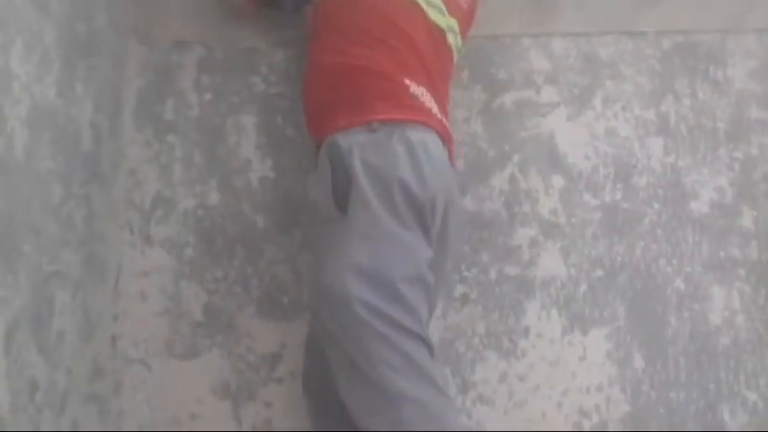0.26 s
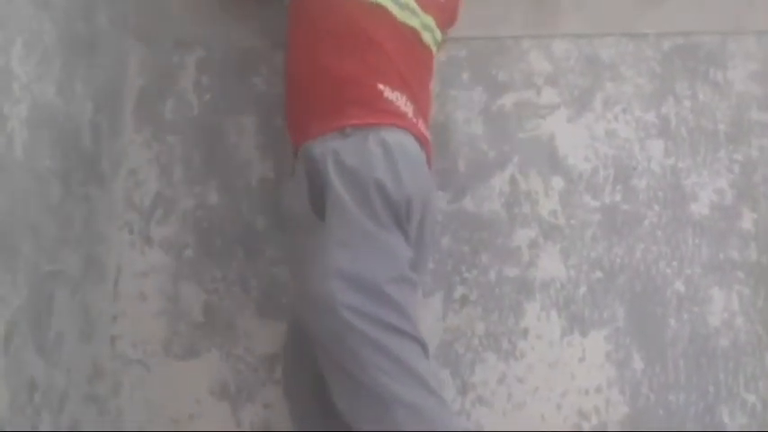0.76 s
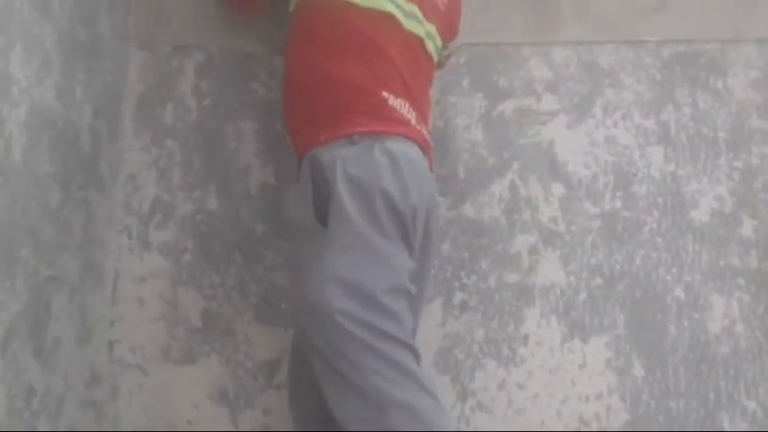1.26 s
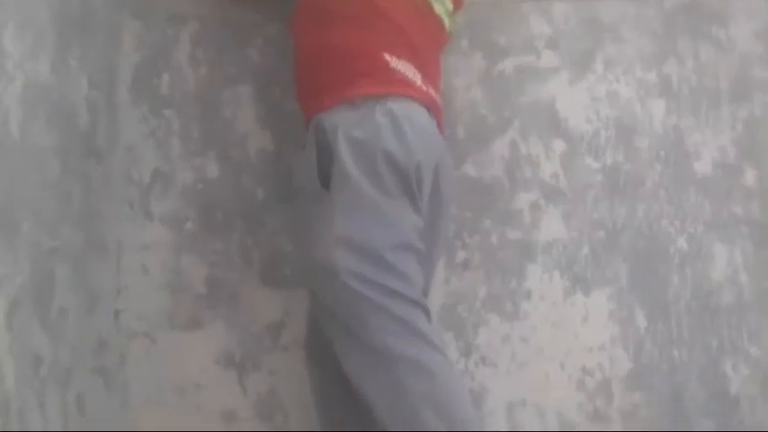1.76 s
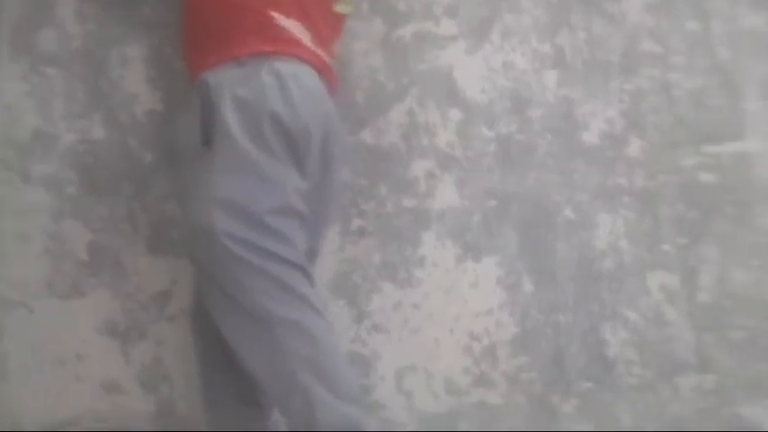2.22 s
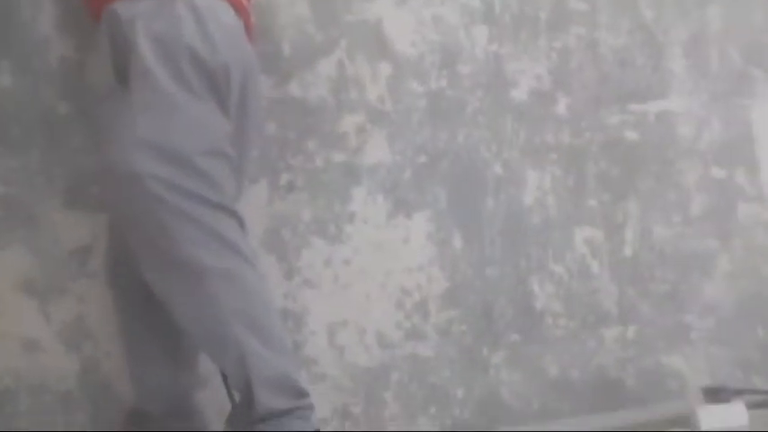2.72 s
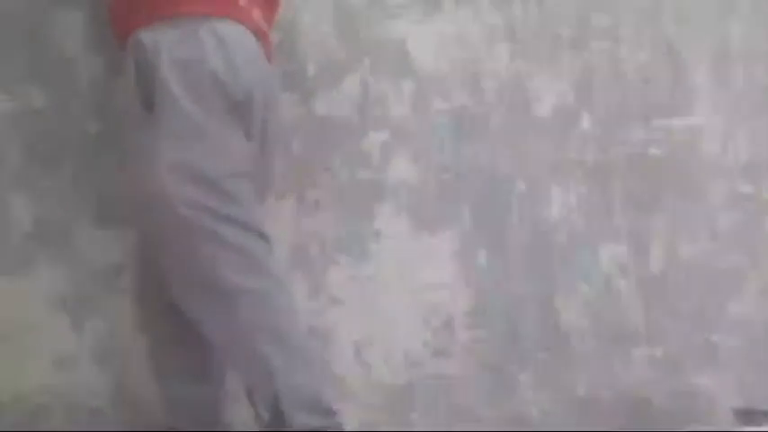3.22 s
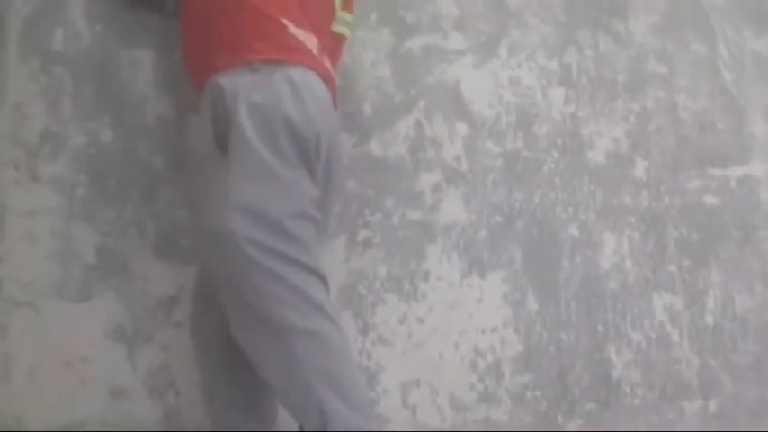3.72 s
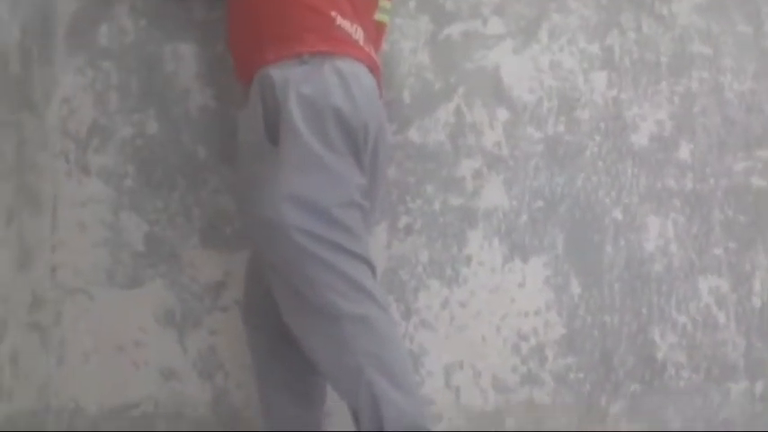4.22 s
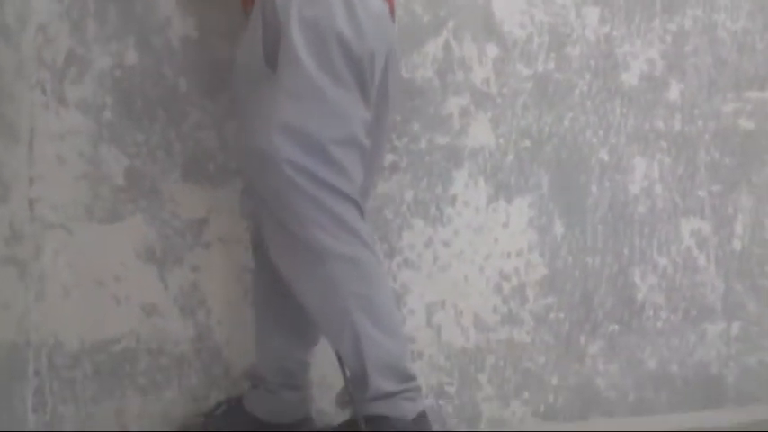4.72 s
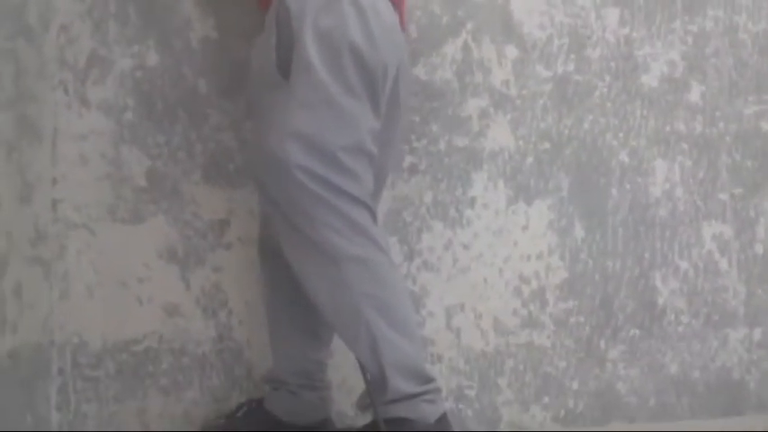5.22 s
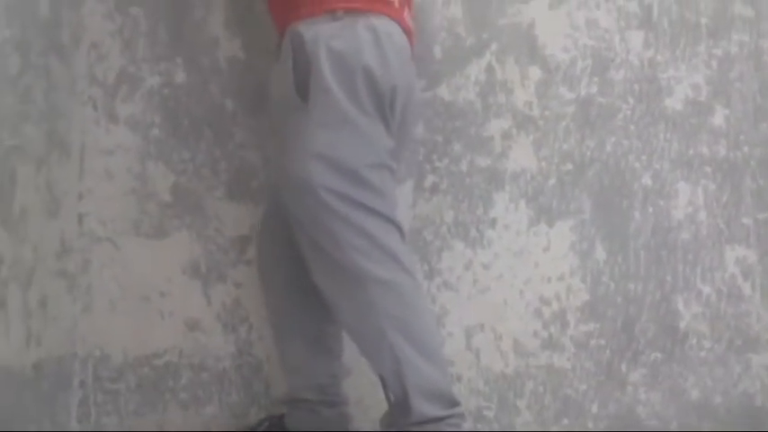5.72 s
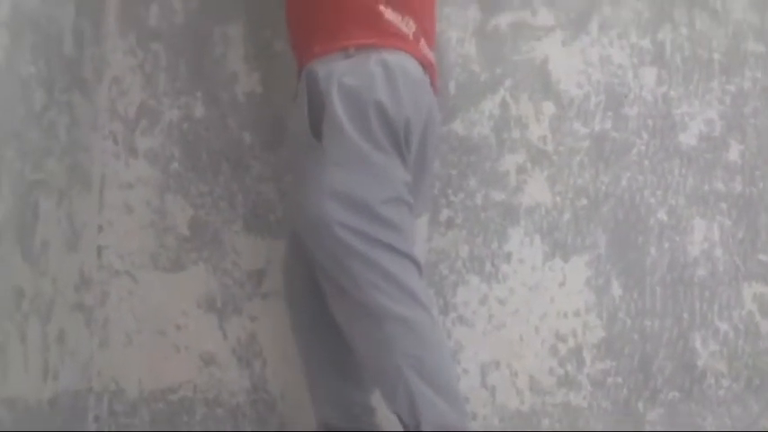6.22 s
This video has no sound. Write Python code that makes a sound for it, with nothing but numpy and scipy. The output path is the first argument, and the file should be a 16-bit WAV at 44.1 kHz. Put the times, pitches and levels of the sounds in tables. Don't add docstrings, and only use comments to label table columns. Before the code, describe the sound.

A close microphone in a bare, hard-walled room at a building site. At first a motor whirs down from earlier work, with a crumb ticking at 0.5 s. At about 0.6 s the rotary hammer restarts, its motor rising quickly into rough, dense hammering of about seventy blows a second, with crunching mortar and metallic chisel rattle. It stops at 1.2 s and the whir sinks in pitch and fades until about 2.6 s. Grit spills briefly at 2.4 s, then trickles thinly from 2.7 to 4.6 s among small crumb clicks and faint tile chinks. A soft dull thump falls at 4.2 s. Loud, sharp tile cracks hit the floor near 4.6 s, a bright one at 4.85 s, another at 5.1 s. Distant murmur and hums linger; a thin far whine enters around 5.4 s. At 5.8 s the hammer surges again, steadier and buzzing, running to the end.

```python
import sys
import numpy as np
from scipy import signal
from scipy.fft import rfft, irfft
from scipy.io import wavfile
from scipy.ndimage import uniform_filter1d

SR = 44100
rng = np.random.default_rng(int(sys.argv[2]) if len(sys.argv) > 2 else 0)


def digitize_waveform(pressure):
    field = np.atleast_2d(pressure).T
    bounded = np.clip(field, -1, 1)
    quanta = np.round(bounded * 32767).astype(np.int16)
    wavfile.write(sys.argv[1], SR, quanta)


def field_ratio(decibels):
    return 10 ** (np.asarray(decibels, dtype=float) / 20)


N = 285327
T = np.arange(N) / SR


def rms_one(x):
    return x / np.sqrt(np.mean(x ** 2) + 1e-20)


def in_time(tables, silent_db=-120):
    out = np.full((len(tables[0][0]) - 1, N), float(silent_db))
    for rows in tables:
        s, *columns = np.transpose(rows)
        inside = (T >= s[0]) & (T <= s[-1])
        out[:, inside] = [np.interp(T[inside], s, c) for c in columns]
    return out


def at_hz(points, hz):
    table_hz, value = np.array(points).T
    return np.interp(np.log(hz + 1), np.log(table_hz), value)


def colour(x, spectrum, size=4096):
    cep = irfft(np.log(field_ratio(at_hz(spectrum, np.fft.rfftfreq(size, 1 / SR)))))
    cep[1:size // 2] *= 2
    cep[size // 2 + 1:] = 0
    h = irfft(np.exp(rfft(cep)))
    return signal.fftconvolve(x, h / np.sqrt(np.sum(h ** 2)))[:len(x)]


def cut(x, hz, kind):
    sos = signal.butter(2, np.clip(hz, 20, .45 * SR), kind, fs=SR, output="sos")
    return signal.sosfilt(sos, x)


def drift(rate_hz):
    return rms_one(cut(rng.standard_normal(N), rate_hz, "low"))


def ring(clicks, hz, t60_s):
    r, w = field_ratio(-60 / (t60_s * SR)), 2 * np.pi * hz / SR
    return signal.lfilter([0, np.sin(w)], [1, -2 * r * np.cos(w), r * r], clicks + 1e-18)


def burst(clicks, t60_s):
    r = field_ratio(-60 / (t60_s * SR))
    return signal.lfilter([np.sqrt(1 - r * r)], [1, -r], clicks) * rng.standard_normal(N)


# frequency in Hz, level in dB per Hz.
SITE_COLOUR = [(30, -24), (100, -13.5), (300, 0.5), (730, -3), (1300, -10), (2050, -14), (3300, -23),
               (4150, -19), (5000, -47), (6700, -33), (15500, -43)]
# frequency in Hz, level in dB.
SITE_HUMS = [(116, -10), (176, -8.5), (305, -14), (760, -12), (870, -12.5), (2021, -14.5), (4150, -20)]
SITE_DB, DUCK_DB = -54, 6.5
LOUD_DB, HOLD_S, RECOVER_S = -26, .66, .3


def site(near):
    far = colour(rng.standard_normal(N), SITE_COLOUR) * field_ratio(0.57 * drift(29))
    hums = sum(field_ratio(db + 4.7 * drift(6)) * np.sin(2 * np.pi * hz * T) for hz, db in SITE_HUMS)
    loud = uniform_filter1d(near ** 2, SR // 50) > field_ratio(2 * LOUD_DB)
    since_loud_s = T - np.maximum.accumulate(T * loud)
    ducked = np.clip(1 - (since_loud_s - HOLD_S) / RECOVER_S, 0, 1)
    return field_ratio(SITE_DB + 5.5 - DUCK_DB * ducked) * (far + hums)


# time in seconds, frequency in Hz, level in dB.
FAR_WHINE = [(5.4, 2960, -76), (5.55, 2910, -67), (5.85, 2880, -66)]


def far_whine():
    hz, db = in_time([FAR_WHINE])
    return field_ratio(db + 3.0 * drift(30)) * np.sin(2 * np.pi * np.cumsum(hz) / SR)


# time in seconds, level in dB, frequency in Hz.
THUMP = (4.212, -33, 150)


def thump():
    s, db, hz = THUMP
    return field_ratio(db) * np.sin(2 * np.pi * hz * (T - s)) * np.exp(-((T - s) / 0.0042) ** 2)


# frequency in Hz, level in dB per Hz.
RUBBLE_COLOUR = [(100, -52), (250, -13.5), (600, -12.5), (2000, -3.5), (3000, -10), (4050, -2), (5400, -18),
                 (7000, -28), (15500, -38.5)]


def landings(rows, decay_s, contact):
    out, t = np.zeros(N), T[:SR // 12]
    parts_hz = [(1250, 2900), (150, 1100), (2900, 5800), (6000, 16000)]
    signs = (1, -1, -1, 1)
    for noise, (s, db, *parts_db) in zip(rng.standard_normal((len(rows), len(t))), rows):
        at = round(s * SR)
        crack = noise * np.exp(-t / decay_s) * (1 - np.exp(-4 * t / decay_s))
        crack[0] += contact
        crack = colour(crack, RUBBLE_COLOUR, size=1024)
        for hz, part_db, sign in zip(parts_hz, [0] + parts_db, signs):
            part = sign * cut(crack, hz, "band")
            out[at:at + len(t)] += field_ratio(db + part_db) * part / np.abs(part).max()
    return out


# start in seconds, end in seconds, level in dB.
TRICKLES = [
    (2.366, 2.58, -45),
    (2.703, 4.6, -58),
]
GRIT_PER_S, GRIT_FADE_DB_PER_S = 1200, 141


def grit():
    grain_db = 3.5 * np.minimum(rng.exponential(1, N), 5)
    grains = (rng.random(N) < GRIT_PER_S / SR) * field_ratio(grain_db) * rng.choice([-1, 1], N)
    flow = sum((T > start) * field_ratio(db - GRIT_FADE_DB_PER_S * np.maximum(T - end, 0))
               for start, end, db in TRICKLES)
    return flow * field_ratio(1.3 * drift(8)) * rms_one(cut(colour(grains, RUBBLE_COLOUR), 3300, "low"))


# time in seconds, body peak in dB, then dull, sharp and bright parts in dB against the body.
SNAPS = [(4.5544, -26, -14, -6.5, 3.5), (4.6282, -5, -35, -4.5, -10), (4.635, -24, -30, 2, 0),
         (4.6414, -3.5, -12, -32.5, -41), (4.8439, -31, -20, 23, 18), (5.1385, -14.5, -1, -0.5, -41)]
# time in seconds, body peak in dB, dull and sharp parts in dB against the body.
CRUMBS = [(0.544, -31.5, -6, -8), (2.3754, -33.5, 10, 4), (2.7028, -33, -21, -11), (3.1014, -41.5, 4, 2),
          (3.15, -44.5, 5, 5.5), (3.3155, -30.5, -1, 0.5), (3.3578, -39.5, 14.5, 1), (3.4725, -39, 10, -2),
          (3.5396, -51.5, 18.5, 2), (3.6584, -45.5, 9.5, 8), (3.7978, -48, 12, 13), (3.8551, -43, 2, -13),
          (3.8814, -40, 9, -8), (4.0294, -53.5, -18, 6.5), (4.0587, -44.5, 0, 2), (4.3664, -57, -12.5, -10),
          (4.5124, -41.5, -2, -3), (4.5344, -42.5, -14, -2), (4.7894, -43.5, 15, -20),
          (5.3276, -40.5, 11, -19.5)]
CRUMB_BRIGHT_DB = -23
# time in seconds, level in dB.
CHINKS = [(3.4725, -47.5), (3.7978, -64), (4.0294, -47.5), (4.3664, -44.5), (4.5344, -47.5)]
# frequency in Hz, level in dB, t60 in seconds (halved when played).
CHINK_MODES = [(5260, 0, .12), (5750, -2, .14)]
# time in seconds, strength in dB.
BIG_FALLS = [(4.555, -24.5), (4.635, -5.5), (4.845, -11.5), (5.1074, -36.5), (5.138, -17.5)]
# frequency in Hz, level in dB, t60 in seconds.
PIECE_MODES = [
    [(5990, 0, .03), (5300, -6, .03), (4250, -8, .02), (9600, -20, .03)],
    [(2003, -4, .012), (4200, -3, .008), (5238, 0, .05), (5720, -9, .04), (9475, -26, .03),
     (11500, -28, .03)],
    [(3122, -11, .08), (3521, -3, .025), (3750, -3, .008), (3984, 0, .012), (4400, -8, .006),
     (5060, -12, .015), (6573, -20, .015), (8100, -40, .2), (9300, -24, .02), (11000, -22, .015),
     (13300, -20, .015)],
    [(5050, 0, .04)],
    [(1950, -3, .005), (3000, -6, .004), (4080, 1, .012), (6100, -24, .05)],
]
ECHO_S, ECHO_DB = .0066, -9


def shards():
    crumbs = [(*row, row[3] + CRUMB_BRIGHT_DB) for row in CRUMBS]
    out = landings(SNAPS, decay_s=0.0013, contact=3.0) + landings(crumbs, decay_s=0.0067, contact=0.3)
    touches = np.zeros(N)
    for s, db in CHINKS:
        touches[round(s * SR)] = field_ratio(db)
    rattle = burst(touches, t60_s=0.14)
    out += sum(field_ratio(db) * ring(rattle, hz, t60_s / 2) for hz, db, t60_s in CHINK_MODES)
    for (s, db), modes in zip(BIG_FALLS, PIECE_MODES):
        click = np.zeros(N)
        click[round(s * SR)] = field_ratio(db)
        click = cut(click, 8000, "low")
        for k, (hz, mode_db, t60_s) in enumerate(modes):
            out += (-1) ** k * field_ratio(mode_db) * ring(click, hz, t60_s)
    return out + field_ratio(ECHO_DB) * np.roll(out, int(ECHO_S * SR))


# time in seconds, blows per second.
SPEED = [
    [(.66, 40), (.71, 52), (.752, 60.5), (.806, 69), (.904, 76), (1.0, 75.3), (1.102, 73.3), (1.195, 70)],
    [(5.845, 30), (5.898, 48), (5.948, 60), (5.98, 66.5), (6.044, 70.5), (6.1, 71.8), (6.18, 72.2),
     (6.414, 71.5), (6.47, 72)],
]
PULL_S = [.618, 5.814]
EARLIER_RELEASE_S = -.75
COAST_S, FULL_BLOWS_PER_S = 1.46, 72


def rotor():
    coasted = (PULL_S[0] - EARLIER_RELEASE_S) / COAST_S
    rows = [(EARLIER_RELEASE_S, FULL_BLOWS_PER_S), (PULL_S[0], FULL_BLOWS_PER_S * (1 - coasted))]
    held = np.zeros(N)
    for pull, run in zip(PULL_S, SPEED):
        release = run[-1][0]
        rows += [(pull, rows[-1][1]), (pull + .001, 12)] + run + [(release + COAST_S, 0)]
        held[(T >= pull) & (T <= release)] = 1
    return np.interp(T, *np.transpose(rows)) / FULL_BLOWS_PER_S + 1e-3, held


# frequency in Hz, level in dB per Hz.
MOTOR_COLOUR = [(88, -75), (150, -19.5), (285, -25.5), (320, -15.5), (396, -17.5), (445, -12.5),
                (681, -10.5), (812, -3), (1170, -4), (1370, 0.5), (1870, 4), (3220, -7), (4060, -0.5),
                (5650, -31), (15500, -64)]
POWERED_DB, COASTING_DB, LET_GO_S = -15.5, -18, 0.041
LEVEL_LAW, BRIGHT_DB, BRIGHT_LAW = 1.736, 14, 0.415
START_DB, START_S = 34.5, 0.015


def motor(flutter_db=-3.0):
    speed, held = rotor()
    speed_db = 20 * np.log10(speed)
    powered = uniform_filter1d(held, max(int(LET_GO_S * SR), 1))
    air = colour(rng.standard_normal(N), MOTOR_COLOUR) * field_ratio(flutter_db * drift(47))
    air = air + (field_ratio(BRIGHT_DB + BRIGHT_LAW * speed_db) - 1) * cut(air, 6500, "high")
    start_db = sum(START_DB * np.exp(-np.abs(T - s) / START_S) for s in PULL_S)
    coast_db = COASTING_DB + (POWERED_DB - COASTING_DB) * powered + LEVEL_LAW * speed_db
    return field_ratio(np.where(held, POWERED_DB - start_db, coast_db) - 7.0) * air


MESH_HZ, FAN_HZ = 1170, 1710
MESH_DB, STRAIN_DB, FULL_STRAIN_PER_S, FAN_DB = -50, 28, 2.2, -39


def strain_of(speed):
    return np.clip(uniform_filter1d(np.gradient(speed) * SR, SR // 15) / FULL_STRAIN_PER_S, 0, 1)


def whine():
    speed, held = rotor()
    strain = strain_of(speed)
    mesh_db = MESH_DB + STRAIN_DB * strain + 40 * np.log10(speed)
    fan_db = FAN_DB - 45 * np.abs(speed - .55)
    db = np.where(held, mesh_db, fan_db)
    wobble = 1 + (.006 + .02 * strain) * drift(25)
    turn = 2 * np.pi * np.cumsum(speed * np.where(held, MESH_HZ, FAN_HZ) * wobble) / SR
    lines = np.sin(turn) * field_ratio(3 * drift(25)) + np.sin(2 * turn) * field_ratio(3 * drift(25))
    return colour(field_ratio(uniform_filter1d(db, SR // 100) - 6) * lines, MOTOR_COLOUR)


# multiple, level in dB.
STROKE_ORDERS = [(2, -12), (3, -8), (4, 0), (5, -7), (6, -9), (7, -3), (8, -7), (9, -4), (12, -5), (13, -6),
                 (17, -4), (19, -1), (21, -1), (26, -2), (30, -1)]
# start in seconds, end in seconds, hum in dB.
EVEN_BITE = [
    (.93, .97, -34),
    (6.06, 6.39, -27),
]
BITE_SLOPE_DB_PER_S = 70


def stroke_hum():
    per_s = np.maximum(in_time(SPEED)[0], 0)
    turn = 2 * np.pi * np.cumsum(per_s) / SR
    lines = sum(field_ratio(db + 1.5 * drift(6)) * np.sin(k * turn + k * k) for k, db in STROKE_ORDERS)
    bite = 0
    for start, end, db in EVEN_BITE:
        outside_s = np.maximum(np.maximum(start - T, T - end), 0)
        bite = bite + field_ratio(db - BITE_SLOPE_DB_PER_S * outside_s)
    return bite * uniform_filter1d(1. * (per_s > 0), SR // 50) * lines


FIRST_BLOW_S = [.669, 5.8495]
# time in seconds, blow in dB, chisel ring in dB.
PUSH = [
    [(.66, -17.5, -58), (.77, -11, -36), (.93, -18, -34), (.98, -13.5, -26), (1.07, -15.5, -25),
     (1.15, -14, -36), (1.195, -16.5, -16.5)],
    [(5.845, -14.5, -67.5), (5.97, -12.5, -37), (6.2, -16.5, -38), (6.47, -16.5, -33.5)],
]
# frequency in Hz, level in dB per Hz.
STRUCK_WALL = [(59, -77.5), (100, -43), (129, -20), (209, -16.5), (253, -15), (281, -8.5), (386, -4.5),
               (497, -6), (601, -7), (2090, 2.5), (2990, -7.5), (4020, -3.5), (5510, -17.5), (13700, -37.5),
               (15500, -74)]
# frequency in Hz, level in dB, t60 in seconds.
CHISEL_MODES = [(6060, -7, .03), (6700, -10, .015), (9660, -9, .04), (9850, -12, .02), (13350, -5, .04),
                (13590, -4, .025), (13800, -5, .03)]


def hammer(uneven_db=1.5, crunch=0.75, jitter_s=.00012):
    wall, chisel = np.zeros(N), np.zeros(N)
    per_s, (blow_db, ring_db) = in_time(SPEED)[0], in_time(PUSH)
    for rows, first in zip(SPEED, FIRST_BLOW_S):
        on = (T >= first) & (T <= rows[-1][0])
        strokes = np.floor(np.cumsum(per_s * on) / SR - 1e-9) * on
        at = np.r_[round(first * SR), np.flatnonzero(np.diff(strokes) > 0)]
        luck = rng.standard_normal((len(at), 3))
        late = np.clip(at + (jitter_s * SR * luck[:, 0]).astype(int), 0, N - 1)
        force = np.sqrt(SR / 72) * (per_s[at] / 72) ** 1.5
        wall[late] = force * field_ratio(blow_db[at] + uneven_db * luck[:, 1])
        chisel[late] = field_ratio(ring_db[at] + 1.2 * luck[:, 2])
    mortar = crunch * cut(burst(wall, t60_s=0.041), 500, "high")
    knocks = colour(wall + mortar, STRUCK_WALL)
    rattle = burst(chisel, t60_s=.03)
    tick = field_ratio(6) * cut(rattle, [5500, 14500], "band")
    ringing = sum(field_ratio(db) * ring(rattle, hz, t60_s) for hz, db, t60_s in CHISEL_MODES)
    return field_ratio(-5) * knocks + tick + field_ratio(2.5) * ringing


# frequency in Hz, t60 in seconds.
ROOM_T60 = [(150, 0.9), (1000, 0.72), (4000, 0.39), (12000, 0.59)]
ROOM_DULL_HZ = 6700


def room(x, wet_db, build_s):
    t, tail = T[:SR], 0
    for low in 60 * 2 ** np.arange(8):
        band = cut(rng.standard_normal(SR), [low, 2 * low], "band")
        band = band * field_ratio(-60 * t / at_hz(ROOM_T60, 1.4 * low))
        band = band * (1 - np.exp(-(t / build_s) ** 2))
        tail = tail + band * np.sqrt(low / np.sum(band ** 2) / 15000)
    lead = np.r_[x[SR // 2:0:-1], x]
    sent = cut(lead, ROOM_DULL_HZ, "low") + field_ratio(-5) * lead
    return x + field_ratio(wet_db) * signal.fftconvolve(sent, tail)[SR // 2:SR // 2 + N]


def scene():
    tones = whine()
    tool = room(hammer() + motor() + tones / 2, wet_db=-0.5, build_s=0.022) + stroke_hum() + tones / 2
    near = tool + room(shards() + grit(), wet_db=-1.0, build_s=0.0026)
    return (near + thump() + site(near) + far_whine())[None]


def top_cut(x):
    return signal.sosfilt(signal.butter(12, 16240, fs=SR, output="sos"), x)


def record(dry):
    rounded = 0.94 * np.tanh(dry / 1.085)
    heard = cut(cut(rounded, 102, "high"), 75, "high")
    rumble = field_ratio(-77) * rms_one(cut(rng.standard_normal(N), [45, 80], "band"))
    return top_cut(heard + rumble)


dry = scene()
out = record(dry)
digitize_waveform(out)
```